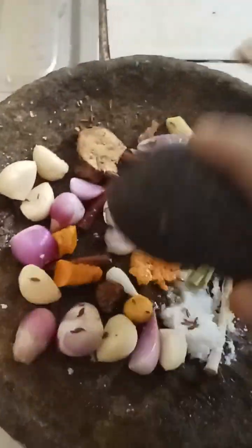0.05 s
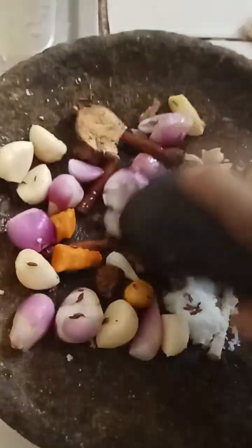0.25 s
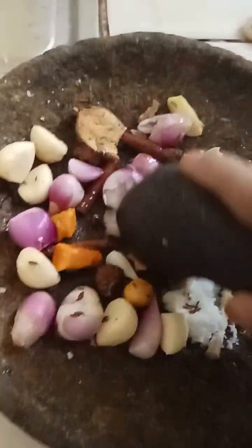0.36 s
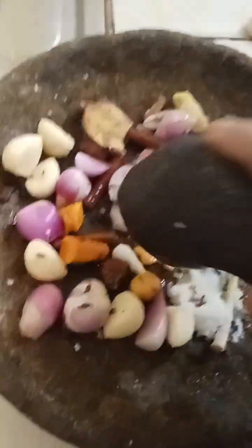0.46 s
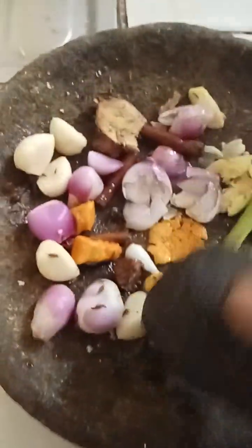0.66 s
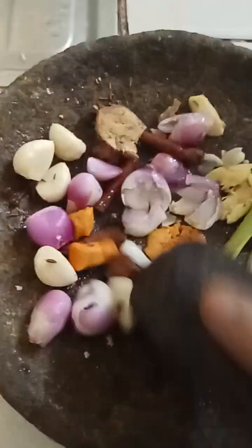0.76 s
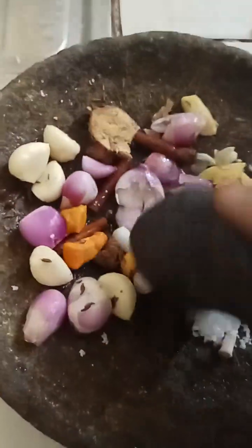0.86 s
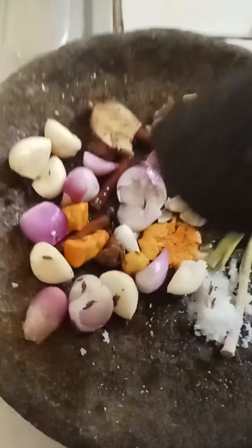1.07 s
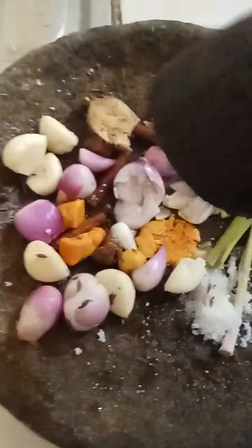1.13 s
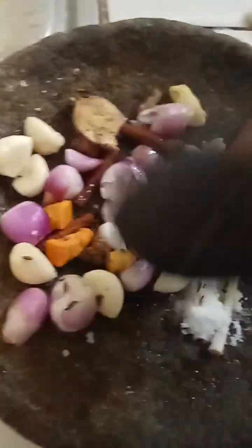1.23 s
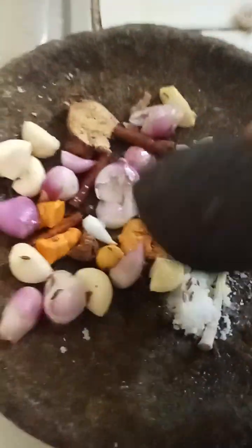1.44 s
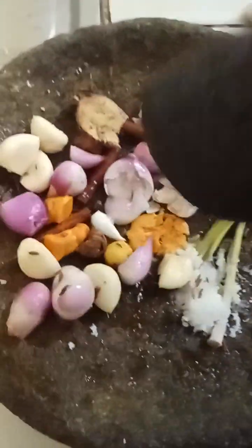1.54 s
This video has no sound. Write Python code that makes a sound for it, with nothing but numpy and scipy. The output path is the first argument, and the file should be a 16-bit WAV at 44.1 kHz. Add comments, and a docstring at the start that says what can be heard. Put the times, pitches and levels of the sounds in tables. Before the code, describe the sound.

A stone pestle pounds vegetables in a stone mortar, with cracks, counter thumps and rocking knocks.

```python
"""A stone pestle crushes vegetables in a stone mortar on a kitchen counter, heard from close by.
At first a blow from just before the start still rings, over soft crushing noise and room tone.
The next blow cracks the food and thumps the counter; small hard bits tick on the stone.
Then the mortar rocks and knocks on its base, and the pestle drags once over grit.
A last blow brings more cracks, ticks and knocks, and the hard room rings on after each hit."""
import sys
import numpy as np
from scipy import signal
from scipy.io import wavfile
from scipy.ndimage import uniform_filter1d

SR = 44100
rng = np.random.default_rng(int(sys.argv[2]) if len(sys.argv) > 2 else 0)


def makeup_ratio(level_db):
    """Linear amplitude ratio for a level in decibels (20 dB per factor of ten)."""
    decades = np.asarray(level_db, float) / 20
    return 10 ** decades


def bounce(signal):
    """Save signal as a 16-bit WAV file at the path given by the first command-line argument."""
    frames = np.transpose(np.atleast_2d(signal))
    limited = np.clip(frames, -1, 1)
    pcm = np.round(limited * 32767).astype(np.int16)
    wavfile.write(sys.argv[1], SR, pcm)


N = 70560  # samples heard
LEAD = 22050  # samples played before time zero
TOTAL = N + LEAD
SECONDS = (np.arange(TOTAL) - LEAD) / SR


def evened(x):
    """Scales a sound to rms 1."""
    return x / np.sqrt(np.mean(x ** 2) + 1e-20)


def read(points, hz):
    """Reads a table of values over pitch at hz, on a log pitch axis."""
    table_hz, value = np.transpose(points)
    return np.interp(np.log(hz + 1), np.log(table_hz + 1), value)


def add(mix, start_s, sound):
    """Mixes a sound in at a start time."""
    part = mix[LEAD + round(start_s * SR):][:len(sound)]
    part += sound[:len(part)]


def level(curve):
    """Turns rows of time and level into a gain over time."""
    time_s, level_db = np.transpose(curve)
    return makeup_ratio(np.interp(SECONDS, time_s, level_db))


def coloured(x, colour):
    """Filters a sound to a given spectrum, with unit energy and no sound ahead of its cause."""
    log_gain = read(colour, abs(np.fft.fftfreq(4096, 1 / SR))) * np.log(10) / 20
    # the Hilbert transform gives the phase that puts the energy as early as possible
    spectrum = np.exp(np.conj(signal.hilbert(log_gain)))
    taps = np.fft.ifft(spectrum).real[:2048]
    return signal.oaconvolve(x, taps / np.linalg.norm(taps))[:len(x)]


def waver(size):
    """Slow random wandering of rms 1, smoothed twice over size samples."""
    once = uniform_filter1d(rng.standard_normal(TOTAL), size)
    return evened(uniform_filter1d(once, size))


def grains(per_s, spread_db):
    """Scattered clicks of random sign; a few are large."""
    size = makeup_ratio(spread_db * np.minimum(rng.exponential(1, TOTAL), 4))
    present = rng.random(TOTAL) < per_s / SR
    return evened(size * rng.standard_normal(TOTAL) * present)


def struck(hits, body):
    """Each hit is a smooth push as long as its contact, ringing the same body."""
    pushes = np.zeros(TOTAL)
    for start_s, level_db, contact_ms in hits:
        contact = contact_ms * SR / 1000  # samples
        u = np.arange(int(contact) + 2) / (contact + 1)
        push = np.sin(np.pi * np.minimum(u, 1)) ** 2
        add(pushes, start_s, makeup_ratio(level_db) * push / push.sum())
    return signal.fftconvolve(pushes, body)[:TOTAL]


def ring(modes, gains):
    """Sums one second of dying sine modes, each with its own sign or gain."""
    t = np.arange(SR) / SR
    out = 0
    for (pitch_hz, level_db, t60_s), gain in zip(modes, gains):
        out = out + gain * makeup_ratio(level_db - 60 * t / t60_s) * np.sin(2 * np.pi * pitch_hz * t)
    return out


def counter_body():
    """The counter's ring, its tones wavering at random in level, with a deep tone that swells and dies."""
    # counter modes: pitch_hz [Hz], level_db [dB], t60_s [s to fall 60 dB]
    modes = [(69.4, -1.5, 0.075), (104, -4.5, 0.14), (164.1, -5, 0.41), (215.93, -1.5, 0.43),
             (263.2, -0.5, 0.36), (280, 5.5, 0.08), (342, -11, 0.46), (449.3, -8.5, 0.33),
             (478.7, 0.5, 0.19)]
    split_hz, waver_db, swell_s = 90, 5, 0.37
    late = np.minimum(np.arange(SR) / SR / swell_s, 1)
    gains = []
    for pitch_hz, level_db, t60_s in modes:
        wander_db = waver_db * np.sqrt(late) * waver(size=900)[:SR]
        gains.append(np.sign(pitch_hz - split_hz) * makeup_ratio(wander_db))  # modes below the split start downwards
    deep = ring([(57.6, -20, 1.11)], [1])  # pitch in Hz, level in dB, t60 in s
    return ring(modes, gains) + np.sin(np.pi * late) * deep


def counter_thumps():
    """Pestle blows, and the mortar rocking back onto its base, thump the counter."""
    # thumps felt by the counter: start_s [s], level_db [dB], contact_ms [ms]
    thumps = [(-.17, -12.5, 2.27), (.2222, -16, 0.92), (.705, -29.5, 4.24), (.775, -27.5, 3.5),
              (1.2305, -13.5, 8.2), (1.275, -29, 2.35)]
    return struck(thumps, counter_body())


def mortar_body(low_gain):
    """The mortar's ring; high modes start together, low neighbours start in opposite senses."""
    # mortar modes: pitch_hz [Hz], level_db [dB], t60_s [s to fall 60 dB]
    modes = [(323.3, 8, 0.039), (391.5, -1.5, 0.13), (504, 6, 0.0092), (622.7, -13, 0.09),
             (730, -15, 0.057), (950.7, -14, 0.065), (1087, -5, 0.043), (1277, -3, 0.067),
             (2283, -0.5, 0.019)]
    split_hz, lowest_hz = 1000, 450  # opposite senses below the first, low_gain below the second
    gains = []
    for k, (pitch_hz, level_db, t60_s) in enumerate(modes):
        sign = (-1) ** k if pitch_hz < split_hz else -1
        gains.append(sign * (low_gain if pitch_hz < lowest_hz else 1))
    return ring(modes, gains)


def mortar_strikes():
    """The pestle meets the mortar and holds it down, so its lowest modes stay still."""
    # strikes: start_s [s], level_db [dB], contact_ms [ms]
    strikes = [(-.17, -6, 0.53), (.2228, -8.5, 0.41), (1.232, -14.5, 1)]
    return struck(strikes, mortar_body(0))


def tail():
    """Sparse room echoes of random sign, each band dying at its own speed."""
    # room decay: pitch_hz [Hz], t60_s [s to fall 60 dB]
    decay = [(100, 0.68), (300, 0.55), (700, 0.49), (1500, 0.26), (3500, 0.35), (9000, 0.2)]
    delay_s, spacing = 0.006, 20  # first echo; then one at random in every 20 samples
    taps = np.zeros(SR)
    slots = np.arange(int(delay_s * SR), SR - spacing, spacing)
    at = slots + rng.integers(0, spacing, len(slots))
    taps[at] = rng.choice([-1., 1.], len(slots))
    hz, t, bands = signal.stft(taps, SR, nperseg=512)
    fade = makeup_ratio(-60 * t / read(decay, hz)[:, None])
    out = signal.istft(bands * fade, SR, nperseg=512)[1]
    return out / np.linalg.norm(out)


def room(x):
    """Two random echo tails trade places slowly; little bass comes back."""
    low_hz, turn_s = 162.7, 1.111
    x = signal.sosfilt(signal.butter(2, low_hz, "high", fs=SR, output="sos"), x)
    turn = 2 * np.pi * np.arange(len(x)) / SR / turn_s
    first = signal.fftconvolve(x * np.sin(turn), tail())[:len(x)]
    second = signal.fftconvolve(x * np.cos(turn), tail())[:len(x)]
    return first + second


def crush():
    """Food crushed under the pestle: dense clicks that clump together, shaped in level and colour."""
    # crushing level: time_s [s], level_db [dB]
    crush_level = [(0, -47), (.1, -69), (.22, -64), (.228, -50), (.3, -43.5), (.335, -48), (.42, -60.5),
                   (.647, -76), (.649, -48), (.657, -49), (.663, -60.5), (.7, -62), (.715, -48.5),
                   (.748, -49), (.766, -42), (.797, -40), (.81, -53.5), (.9, -62), (1.228, -73),
                   (1.238, -41), (1.305, -45), (1.325, -54), (1.4, -63), (1.6, -85)]
    # crushing spectrum: pitch_hz [Hz], density_db [dB per Hz, only its shape counts]
    colour = [(880, -19.5), (1810, 0), (1980, -1.5), (3580, 3), (4290, -8), (7360, -21.5), (9640, -9.5),
              (11800, -21), (15000, -17.5), (16400, -42.5)]
    clump_db = 3.5
    bits = grains(per_s=6000, spread_db=2.5) * makeup_ratio(clump_db * waver(size=60))
    return level(crush_level) * coloured(evened(bits), colour)


def room_tone():
    """Steady noise of the quiet room, with its own spectrum."""
    # room tone spectrum: pitch_hz [Hz], density_db [dB per Hz, only its shape counts]
    colour = [(35, -70.5), (60, -14), (333, -6), (657, -5.5), (1130, -11), (2820, -17.5), (7200, -40.5),
              (14900, -41)]
    return makeup_ratio(-54) * coloured(rng.standard_normal(TOTAL), colour)


def cracks():
    """Food splits: a snap, then a short noise burst that dies within about its length."""
    # food splitting: start_s [s], level_db [dB], length_ms [ms]
    splits = [(0.2219, -8, 3.5), (0.223, -21, 3), (0.236, -31, 5), (.315, -37.5, 5.2), (0.764, -48, 3.1),
              (1.2299, -23.5, 8.9), (1.2334, -11, 2.5), (1.239, -36.5, 11), (1.248, -41, 1.5),
              (1.3082, -31, 3.1)]
    # crack spectrum: pitch_hz [Hz], density_db [dB per Hz, only its shape counts]
    colour = [(200, -15), (500, 0), (1100, -10), (1600, -24.5), (2200, -1.5), (3900, -7.5), (5000, -20),
              (7200, -37), (9900, -14), (13000, -28), (15500, -26)]
    snap_db = 16  # first break of each crack, over its burst
    bursts, snaps = np.zeros((2, TOTAL))
    for start_s, level_db, length_ms in splits:
        u = np.arange(2000) / SR * 1000 / length_ms  # time in burst lengths
        add(bursts, start_s, makeup_ratio(level_db) * np.minimum(u / 0.51, 1) * np.exp(-u ** 2))
        add(snaps, start_s, makeup_ratio(np.array([level_db + snap_db])))
    return coloured(bursts * rng.standard_normal(TOTAL) - snaps, colour)


def ticks():
    """Small hard bits tick on stone: each a high short ring of two slightly detuned tones."""
    # ticks: start_s [s], level_db [dB for each of the two tones]
    bits = [(0.2946, -39.5), (0.6494, -52.5), (0.7218, -54), (0.785, -57), (0.845, -53.5), (1.2541, -41),
            (1.2688, -38.5), (1.311, -48)]
    pitch_hz, t60_s, rise_s, spread = 9640, 0.05, 0.00041, 0.0058  # spread: share of the pitch
    out, t = np.zeros(TOTAL), np.arange(3000) / SR
    for start_s, level_db in bits:
        pair = 0
        for detune in rng.standard_normal(2):
            pair = pair + np.sin(2 * np.pi * pitch_hz * (1 + spread * detune) * t)
        fade = makeup_ratio(level_db - 60 * t / t60_s) * np.minimum(t / rise_s, 1)
        add(out, start_s, fade * pair)
    return out


def mortar_knocks():
    """The mortar knocks down on its base; its lowest modes swell in as the base settles."""
    # knocks: start_s [s], level_db [dB], contact_ms [ms]
    knocks = [(.675, -31, 0.6), (.6925, -25.5, 1.45), (.7044, -15, 0.52), (.7737, -13, 0.54),
              (.8135, -21, 1.24), (1.2741, -11.5, 0.35), (1.313, -31.5, 0.74), (1.374, -36, 1.1)]
    rise_s = 0.012
    rise = np.sin(np.pi / 2 * np.minimum(np.arange(SR) / SR / rise_s, 1)) ** 2
    return struck(knocks, mortar_body(rise))


def drag():
    """Grit slips under stone through resonances that waver, then weaken as the stroke slows."""
    # drag level before halving: time_s [s], level_db [dB]
    drag_level = [(.879, -85.5), (.884, -48.5), (.905, -47), (.945, -52), (.99, -46), (1.07, -51),
                  (1.13, -51.5), (1.146, -62)]
    # resonances: pitch_hz [Hz], width_hz [Hz for one of two passes], level_db [dB], fade_start_s [s]
    bands = [(2050, 250, -5, 1.09), (2820, 130, 1, 1.2), (3080, 160, -1, 1.09), (3560, 450, -2, 1.07),
             (4380, 260, -9, 1.13)]
    fade_s, fade_depth_db, waver_db = 0.03, 10, 1
    grit = grains(per_s=9000, spread_db=1)
    out = 0
    for pitch_hz, width_hz, level_db, fade_start_s in bands:
        b, a = signal.iirpeak(pitch_hz, pitch_hz / width_hz, SR)
        tone = evened(signal.lfilter(b, a, signal.lfilter(b, a, grit)))
        fade_db = -fade_depth_db * np.clip((SECONDS - fade_start_s) / fade_s, 0, 1)
        out = out + makeup_ratio(level_db + fade_db + waver_db * waver(size=900)) * tone
    return out / 2 * level(drag_level)


def scene():
    """Mixes stone, food, drag and room tone with the room's answer to all but crushing and tone."""
    hits = counter_thumps() + mortar_strikes() + mortar_knocks()
    food = cracks() + ticks()
    scrape = drag()
    # the room gets the hits at -5 dB and the food at -15 dB; the drag counts double
    wet = room(makeup_ratio(-5) * hits + makeup_ratio(-15) * (food + 2 * scrape))
    mix = hits + food + wet + crush() + scrape + room_tone()
    return mix[None, LEAD:]


def top_cut(x):
    """Nothing passes above the cut-off."""
    return signal.sosfilt(signal.butter(12, 16520, fs=SR, output="sos"), x)


def record(dry):
    """The microphone drops the deep bass and overloads on peaks; then the top treble is cut."""
    low_hz, overload, edge_hz = 56.4, 0.95, 15900  # overload: peak value
    x = signal.sosfilt(signal.butter(4, low_hz, "high", fs=SR, output="sos"), dry)
    x = np.clip(x, -overload, overload)
    treble_cut = signal.firwin(255, edge_hz, window=("kaiser", 7), fs=SR)
    x = signal.oaconvolve(x, treble_cut[None], "same")
    return top_cut(x)


dry = scene()
out = record(dry)
bounce(out)
```